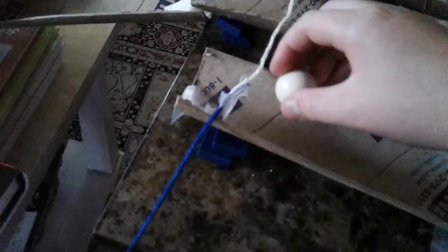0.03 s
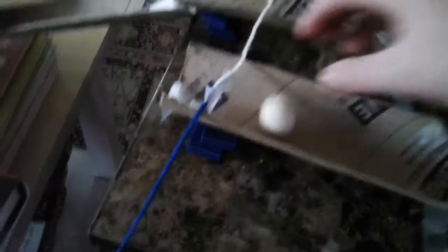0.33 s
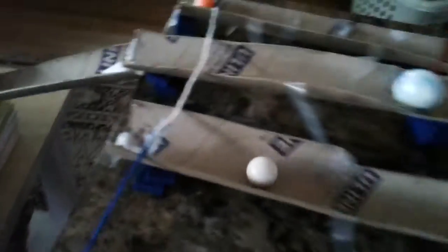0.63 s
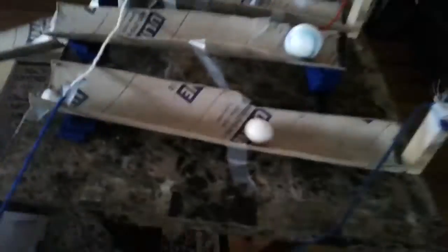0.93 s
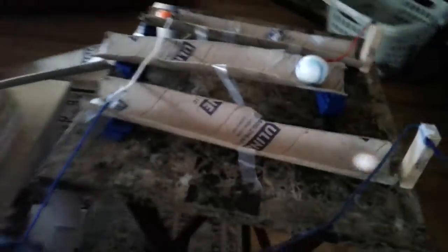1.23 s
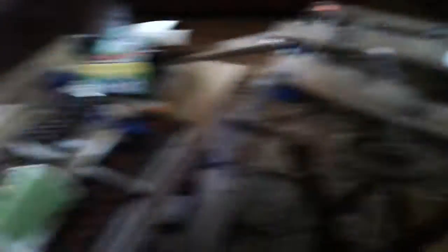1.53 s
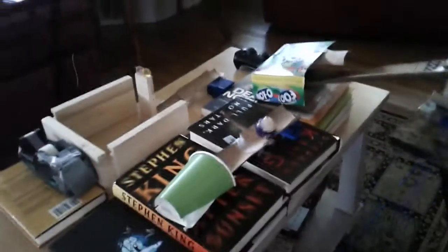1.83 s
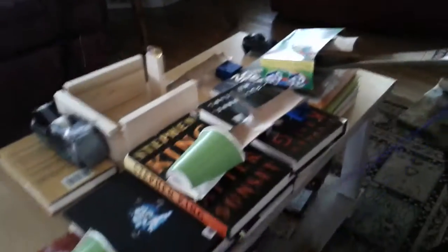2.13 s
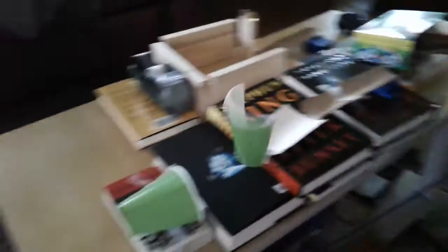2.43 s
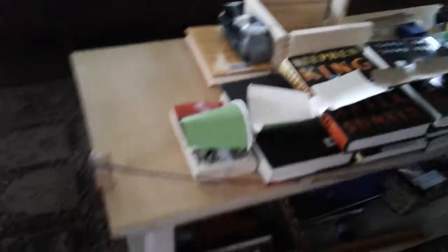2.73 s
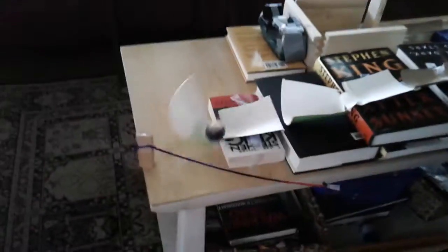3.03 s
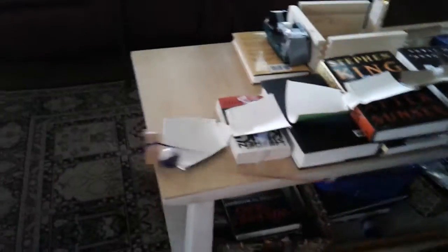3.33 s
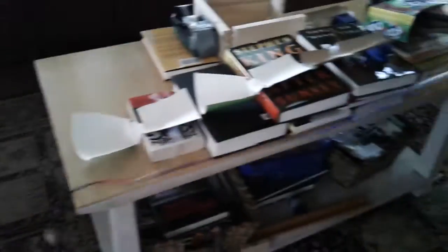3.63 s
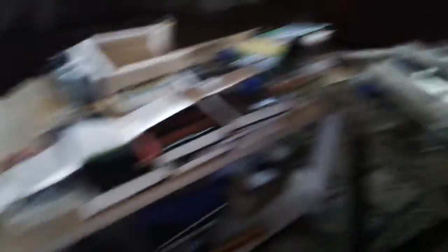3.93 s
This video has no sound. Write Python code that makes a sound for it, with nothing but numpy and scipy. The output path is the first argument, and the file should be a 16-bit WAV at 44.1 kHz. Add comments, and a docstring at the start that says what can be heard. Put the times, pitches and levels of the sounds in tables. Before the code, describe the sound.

A small ball rolls softly down a cardboard ramp and bumps a wooden block. Weights clatter onto books, a paper cup bounces, and a heavy thud follows, in a small room with a faint hum.

```python
"""A ball rumbles down a cardboard ramp and bumps a wooden block; then weights clatter onto books, paper
cups tip over and bounce, and a heavy thud ends this homemade chain reaction. Under it all lie a low hum
and faint rustling. Each hit is a click and a short burst of noise, shaped to suit the object and echoed
by the table and a small room. Rolling and rubbing are thousands of tiny clicks a second.
Everything is heard through one small microphone."""
import sys
import numpy as np
from scipy import signal
from scipy.fft import rfft, irfft
from scipy.io import wavfile
from scipy.ndimage import uniform_filter1d, minimum_filter1d

SR = 44100
rng = np.random.default_rng(int(sys.argv[2]) if len(sys.argv) > 2 else 0)


def wrap_up_sound(samples):
    """Save the sound to the file named by the first command line argument, as 16-bit audio."""
    columns = np.atleast_2d(samples).T
    # keep every value between -1 and 1, then stretch to whole-number steps
    tamed = np.clip(columns, -1, 1)
    steps = np.round(tamed * 32767).astype(np.int16)
    wavfile.write(sys.argv[1], SR, steps)


N = 176400
SIZE = 65536  # samples in one hit or one filter
HZ, AGE, T = np.fft.rfftfreq(SIZE, 1 / SR), np.arange(SIZE) / SR, np.arange(N) / SR
KNOCK_T60, TICK_T60 = 0.041, 0.022  # a t60 is the seconds a sound takes to fade by 60 dB

# Tone of a knock on cups, books and cardboard (frequency [Hz], gain [dB])
KNOCK_TONE = [(30, -41.5), (150, -2.5), (330, 4.5), (1900, 6.5), (3200, 1), (5000, -14.5), (7500, -10.5),
              (10500, -36), (16000, -55)]


def amp(db):
    """Turn decibels into a number to multiply by."""
    return 10 ** (np.asarray(db) / 20)


def unit(x):
    """Scale a sound so its average strength (rms) is 1."""
    return x / np.sqrt(np.mean(x ** 2) + 1e-20)


def along(points, hz=HZ):
    """Join (frequency, value) points into a curve, spaced by octaves."""
    freqs, values = np.transpose(points)
    return np.interp(np.log(hz + 1), np.log(freqs + 1), values)


def fade(t, t60):
    """Die away by 60 dB every t60 seconds."""
    return np.exp(-np.log(1000) * t / t60)


def peaks(notes):
    """A bump of height 1 at each (pitch, width) where an object likes to ring."""
    return sum(1 / (1 + (2 * (HZ - hz) / width) ** 2) for hz, width in notes)


def band(hz, octaves):
    """Gain in dB that keeps only the sound around one pitch."""
    distance = np.log2((HZ + 1) / hz) / octaves
    return -40 * np.log10(1 + (distance / 2) ** 2)


def shelves(bass_db, treble_db):
    """Gain in dB: heavier hits have more bass, harder ones more treble."""
    return bass_db / (1 + (HZ / 540) ** 2) + treble_db * (1 - 1 / (1 + (HZ / 3830) ** 4))


def colour(x, db):
    """Shape the tone of x with a gain in dB for each frequency."""
    cepstrum = irfft(np.log(amp(db) + 1e-7))
    cepstrum[1:SIZE // 2] *= 2  # folding it makes the filter ring only after a hit, never before
    cepstrum[SIZE // 2 + 1:] = 0
    response = irfft(np.exp(rfft(cepstrum)))
    return signal.fftconvolve(x, response)[:len(x)]


def add(out, start, x):
    """Mix x in, beginning at start seconds."""
    i = int(start * SR)
    out[i:i + len(x)] += x[:N - i]


def grains(tone, per_second):
    """A rough surface makes many tiny random clicks of uneven size."""
    clicks = (rng.random(N) < per_second / SR) * rng.standard_normal(N)
    clicks *= amp(2.5 * rng.standard_normal(N))
    return unit(colour(clicks, along(tone)))


def stroke(start, length):
    """The rounded rise and fall of one rub."""
    progress = np.clip((T - start) / length, 0, 1)
    return np.sqrt(np.abs(np.sin(np.pi * progress)))


def table_db():
    """The tabletop boosts the pitches it rings at."""
    # Ringing notes of the tabletop (pitch [Hz], width [Hz])
    notes = [(325, 9.1), (484, 7), (626, 24), (816, 77), (1085, 120), (1880, 10), (2714, 40), (3290, 38)]
    return 3 * peaks(notes)


def room():
    """Echoes off the walls blur into noise that builds quickly and dies away."""
    # How long the room rings (frequency [Hz], t60 [s])
    fade_times = [(100, 0.34), (3000, 0.44), (12000, 0.39)]
    hz, t, spectrum = signal.stft(rng.standard_normal(SIZE), SR, nperseg=256)
    spectrum *= fade(t, along(fade_times, hz)[:, None])
    tail = signal.istft(spectrum, SR, nperseg=256)[1][:SIZE]
    return tail * (1 - np.exp(-AGE / .012))


def hit(tone_db, t60, rattle, room_db, echo=None):
    """One hit: a click, a duller noisy ring (rattle sets its strength), then the table and room."""
    # Tone of the room's echo (frequency [Hz], gain [dB])
    room_tone = [(60, 5), (250, 4), (7500, -1.5), (14000, -11.5)]
    dull = signal.butter(1, 5400, fs=SR, output="sos")
    ring = signal.sosfilt(dull, rng.standard_normal(SIZE)) * fade(AGE, t60)
    contact = rattle * ring / np.linalg.norm(ring)
    contact[0] += 1  # the click
    direct = unit(colour(contact, tone_db))
    echo = room() if echo is None else echo
    tail = unit(colour(echo, tone_db + along(room_tone) + table_db()))
    return (direct + amp(room_db) * tail) * np.sqrt(.01 * SR / SIZE)  # direct energy: 10 ms at rms 1


def background():
    """Low room noise and an appliance's hum, both a little quieter from the clatter on."""
    # Tone of the room noise (frequency [Hz], gain [dB])
    air_tone = [(20, -36.5), (55, 1.5), (130, -1.5), (220, -7), (5000, -36.5), (16000, -39.5)]
    hum_hz, dip_s, dip_db = 120.3, 2.2, -4
    hum = amp(-56) * np.sqrt(2) * np.sin(2 * np.pi * (hum_hz * T + rng.random()))
    air = amp(-54.5) * unit(colour(rng.standard_normal(N), along(air_tone)))
    return (hum + air) * amp(dip_db * np.clip((T - dip_s) * 10, 0, 1))


def rolling():
    """The ball rumbles over rough cardboard and shakes the table; a thin hiss comes and goes."""
    # Loudness of the rolling (time [s], level [dB])
    levels = [(.43, -42.5), (.75, -64), (1.05, -66), (1.22, -50.5), (1.36, -70), (1.6, -86)]
    # Tone of the ball on the ramp (frequency [Hz], gain [dB])
    tone = [(60, -34), (250, 11), (600, 4.5), (2000, -11), (16000, -89)]
    # The hiss on the lower ramp (time [s], length [s], level [dB], pitch [Hz])
    ramp_hiss = (.95, .34, -65, 4450)
    rumble = unit(colour(grains(tone, per_second=2500), table_db()))
    rumble *= amp(np.interp(T, *np.transpose(levels)))
    start, length, db, hz = ramp_hiss
    hiss = unit(colour(rng.standard_normal(N), band(hz, octaves=.07)))
    return rumble + amp(db) * stroke(start, length) ** 2 * hiss


def knocks():
    """The ball is let go with a soft, dull knock; later cups and weights land and bounce."""
    # Knocks (time [s], level [dB], bass [dB], treble [dB], echo [dB])
    contacts = [(.434, -40, 1, -28, -0.5), (2.1176, -17.5, 0.5, -1.5, 8.5), (2.3015, -22, 2, 6.5, 0.5),
                (2.3829, -11, -9, 6.5, -1.5), (2.399, -20.5, 2, 12.5, 8.5), (2.7392, -16.5, -16, 7, 0),
                (3.5085, -31.5, 0, 16.5, 3), (3.5532, -36.5, 10, 19.5, 7.5)]
    out = np.zeros(N)
    for start, db, bass_db, treble_db, room_db in contacts:
        tone_db = along(KNOCK_TONE) + shelves(bass_db, treble_db)
        add(out, start, amp(db) * hit(tone_db, KNOCK_T60, rattle=1, room_db=room_db))
    return out


def friction():
    """Surfaces rub: faint rustling, quick dry crinkles and cardboard sliding."""
    # Loudness of the rustling (time [s], level [dB])
    rustle_levels = [(.44, -50.5), (.8, -67.5), (1.08, -52), (1.3, -72.5), (1.45, -74), (1.55, -50),
                     (1.82, -58), (1.95, -44.5), (2.1, -57), (3.9, -60)]
    # Tone of the rustling (frequency [Hz], gain [dB])
    rustle_tone = [(300, -5), (4400, -11.5), (5300, -11.5), (7000, 6.5), (10500, -18.5), (16000, -43.5)]
    # Crinkles (time [s], length [s], level [dB])
    crinkles = [(.934, 0.023, -37), (1.464, 0.0065, -33.5), (1.474, 0.018, -35.5), (1.891, 0.026, -39)]
    # Tone of a crinkle (frequency [Hz], gain [dB])
    crinkle_tone = [(500, -39), (3000, -1.5), (5000, -7), (7200, 10.5), (10500, -10), (16000, -26)]
    # Cardboard slides (time [s], length [s], level [dB])
    slides = [(1.68, 0.23, -54.5), (1.935, 0.099, -47.5)]
    # Tone of a slide (frequency [Hz], gain [dB])
    slide_tone = [(150, -20), (2200, 2.5), (5000, -9.5), (12000, -25)]
    out = amp(np.interp(T, *np.transpose(rustle_levels))) * grains(rustle_tone, per_second=7800)
    for rubs, tone in [(crinkles, crinkle_tone), (slides, slide_tone)]:
        for start, length, db in rubs:
            out += amp(db) * stroke(start, length) * grains(tone, per_second=12000)
    return out


def snaps():
    """The released ball taps and the hardest landing cracks, with almost no ring."""
    # Sharp contacts (time [s], level [dB], pitch [Hz], half-width [octaves])
    contacts = [(0.5086, -34, 1860, 0.34), (2.3824, -11.5, 3130, 0.5)]
    out = np.zeros(N)
    for start, db, hz, octaves in contacts:
        add(out, start, amp(db) * hit(band(hz, octaves), TICK_T60, rattle=0.2, room_db=-3.5))
    return out


def thumps():
    """Soft contacts stir only a low, blurry note."""
    # Soft bumps (time [s], relative level [dB], pitch [Hz], t60 [s])
    bumps = [(0.524, -34, 324, 0.1), (0.932, -36.5, 88.5, 0.15), (1.009, -34, 68, 0.13),
             (1.849, -39.5, 188, 0.07), (3.516, -43, 228, 0.39), (3.803, -50, 530, 0.4)]
    out = np.zeros(N)
    swell = 1 - np.exp(-AGE / 0.012)
    for start, db, hz, t60 in bumps:
        body = unit(colour(rng.standard_normal(SIZE), band(hz, octaves=0.28)))
        add(out, start, 2 * amp(db) * body * swell * fade(AGE, t60))
    return out


def ticks():
    """Light, hard contacts tick between the bigger hits."""
    # Light taps (time [s], level [dB])
    taps = [(0.9114, -48.5), (1.55, -39.5), (2.283, -30.5), (2.5998, -37.5), (2.679, -37.5), (2.7028, -27),
            (2.708, -28), (3.223, -37.5), (3.3768, -42), (3.735, -41.5)]
    # Tone of a tick (frequency [Hz], gain [dB])
    tone = [(100, -16), (700, 2), (2800, 5.5), (5000, -3), (7500, 9), (10500, -12.5), (16000, -20)]
    out = np.zeros(N)
    for start, db in taps:
        add(out, start, amp(db) * hit(along(tone), TICK_T60, rattle=5.1, room_db=-2))
    return out


def block():
    """The ball bumps a wooden block at the foot of the ramp, and the wood rings hollow."""
    # Bumps of ball and block (time [s], level [dB], treble [dB])
    bumps = [(1.4934, -27.5, 2.5), (1.608, -28, -24)]
    # Tone of the wood (frequency [Hz], gain [dB])
    tone = [(80, -38), (450, -12), (1400, -3), (2300, -4), (3000, -14), (9000, -13), (16000, -38)]
    # Ringing notes of the block (pitch [Hz])
    pitches = [487, 936, 1255, 1400, 1648]
    width_hz = 72
    wood_db = along(tone) + 10 * peaks((hz, width_hz) for hz in pitches)
    out = np.zeros(N)
    for start, db, treble_db in bumps:
        add(out, start, amp(db) * hit(wood_db + shelves(0, treble_db), t60=0.11, rattle=9.9, room_db=-4.5))
    return out


def clack():
    """One hard contact rings briefly and high."""
    # The contact (time [s], level [dB], echo [dB])
    contact = (2.133, -13.5, -1.5)
    # Tone of the clack (frequency [Hz], gain [dB])
    tone = [(100, -9.5), (1200, -2.5), (1900, 2.5), (5000, -24.5), (7100, -2.5), (10500, -30), (16000, -56)]
    # Its ringing notes (pitch [Hz], width [Hz])
    notes = [(1114, 50), (1717, 43), (7080, 230)]
    start, db, room_db = contact
    tone_db = along(tone) + 9 * peaks(notes)
    out = np.zeros(N)
    add(out, start, amp(db) * hit(tone_db, t60=0.022, rattle=3, room_db=room_db))
    return out


def cup():
    """A paper cup bounces ever faster on one spot, so each tap has the same hollow tone and echo."""
    # Bounces (time [s], level [dB])
    bounces = [(2.9385, -22.5), (3.075, -25.5), (3.167, -28), (3.2327, -30), (3.278, -29.5)]
    # Ringing notes of the cup (pitch [Hz], width [Hz])
    notes = [(330, 79), (410, 30), (722, 13), (945, 120), (1320, 70), (1530, 16), (1830, 21)]
    tone_db = along(KNOCK_TONE) + shelves(bass_db=-9.5, treble_db=7.5) + 6.5 * peaks(notes)
    out, echo = np.zeros(N), room()
    for start, db in bounces:
        add(out, start, amp(db) * hit(tone_db, KNOCK_T60, rattle=1, room_db=-0.5, echo=echo))
    return out


def thud():
    """Something heavy falls flat and bounces once."""
    # The fall (time [s], level [dB], echo [dB])
    fall = (3.9132, -11.5, 4.5)
    # Tone of the thud (frequency [Hz], gain [dB])
    tone = [(30, -34), (110, -5), (350, 0.5), (1500, 6.5), (2500, -4.5), (4200, -31), (7200, -20.5),
            (11000, -54), (16000, -109)]
    start, db, room_db = fall
    out = np.zeros(N)
    for delay_s, drop_db in [(0, 0), (0.028, -15)]:
        impact = hit(along(tone), t60=0.017, rattle=0.37, room_db=room_db)
        add(out, start + delay_s, amp(db + drop_db) * impact)
    return out


def scene():
    """All the sounds added together in one channel."""
    mix = background() + rolling() + knocks() + friction() + snaps() + thumps()
    mix += ticks() + block() + clack() + cup() + thud()
    return mix[None]


def record(dry):
    """The microphone opens after a silence, rings in the treble and loses the extreme lows and highs."""
    open_s, ring_hz, ring_width_hz = .431, 6590, 860
    low_cut_hz, top_hz, ceiling = 56, 15900, .96
    x = dry[0] * np.clip((T - open_s) / 0.002, 0, 1)
    x = colour(x, 4 * peaks([(ring_hz, ring_width_hz)]))  # the microphone's small opening rings
    x = signal.sosfilt(signal.butter(2, low_cut_hz, "high", fs=SR, output="sos"), x)
    safe_gain = ceiling / np.maximum(np.abs(x), ceiling)  # a fast limiter turns loud peaks down
    x *= uniform_filter1d(minimum_filter1d(safe_gain, size=129), size=129)
    top_cut = np.clip((top_hz - np.fft.rfftfreq(N, 1 / SR)) / 900 + .5, 0, 1)
    return irfft(rfft(x) * top_cut, N)[None]


dry = scene()
out = record(dry)
wrap_up_sound(out)
```